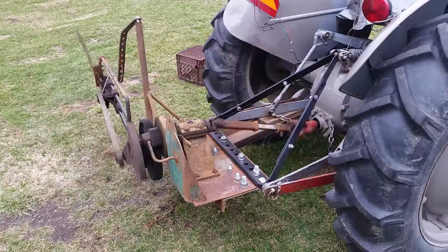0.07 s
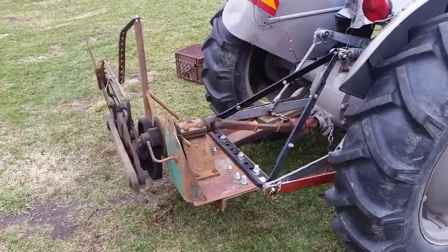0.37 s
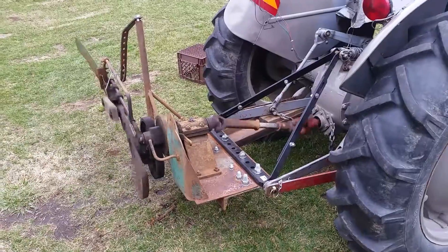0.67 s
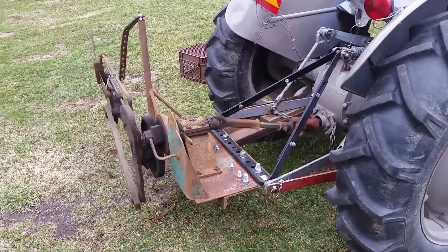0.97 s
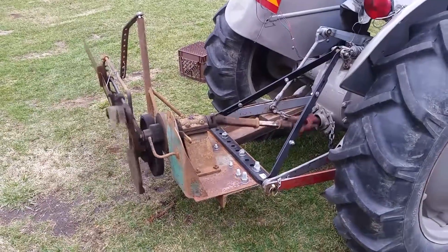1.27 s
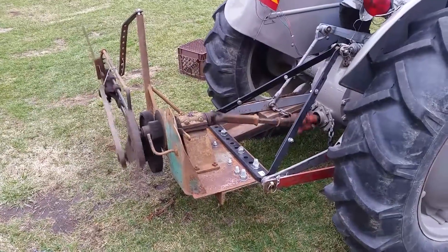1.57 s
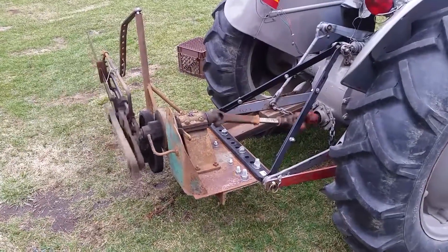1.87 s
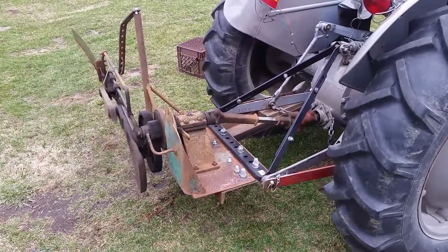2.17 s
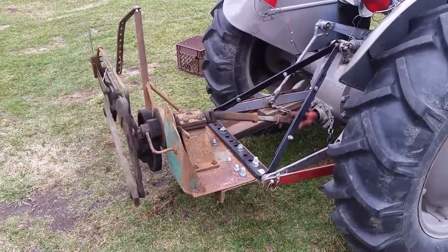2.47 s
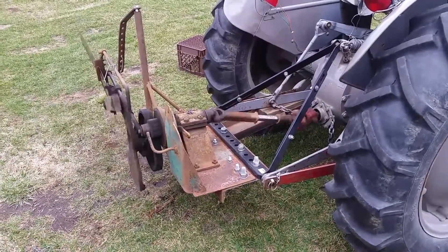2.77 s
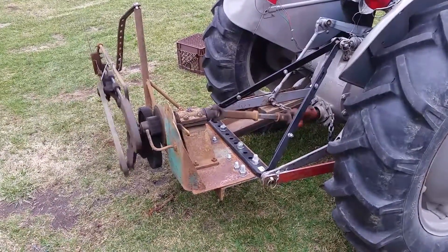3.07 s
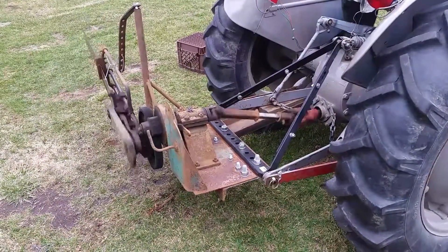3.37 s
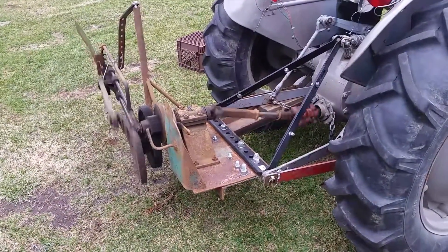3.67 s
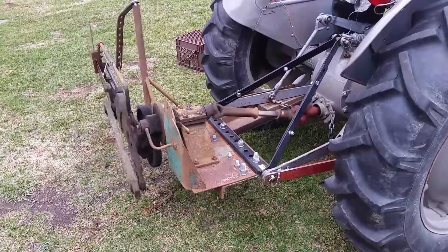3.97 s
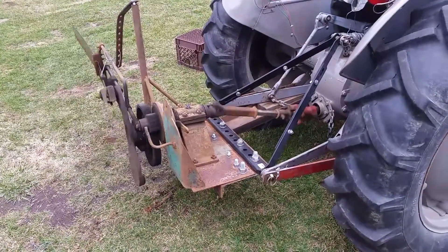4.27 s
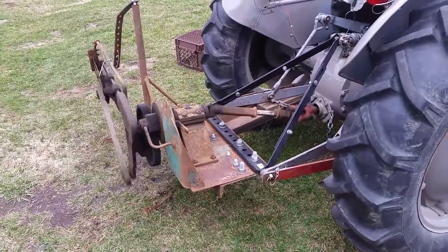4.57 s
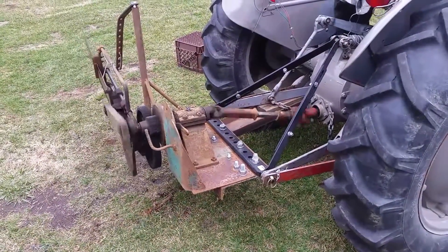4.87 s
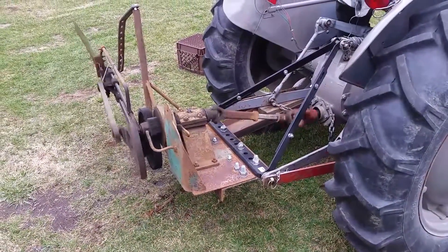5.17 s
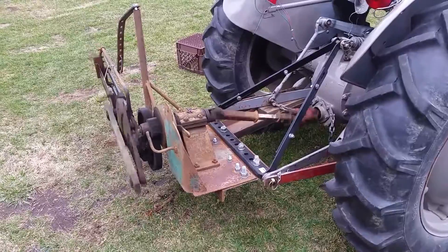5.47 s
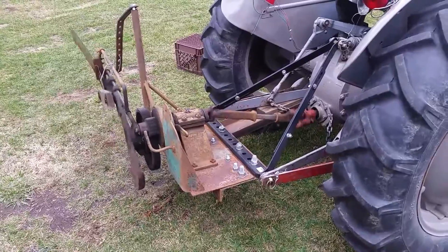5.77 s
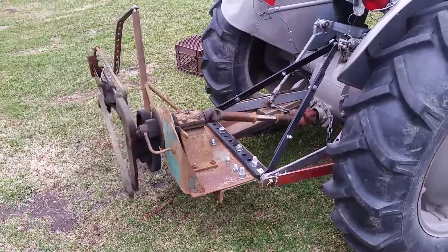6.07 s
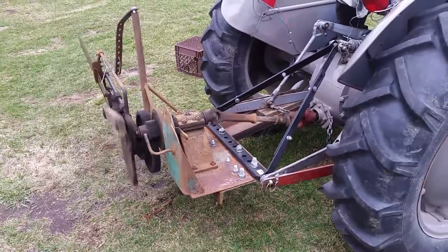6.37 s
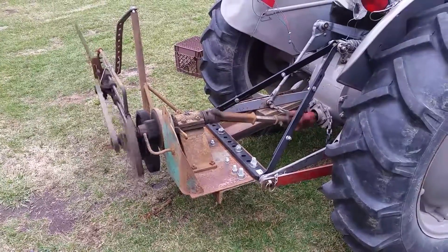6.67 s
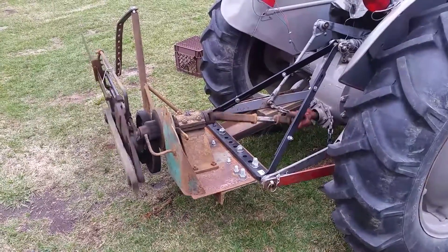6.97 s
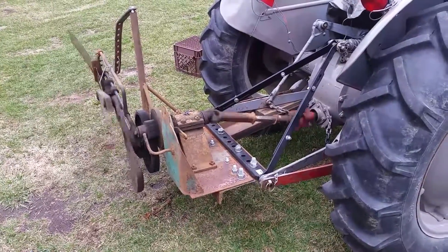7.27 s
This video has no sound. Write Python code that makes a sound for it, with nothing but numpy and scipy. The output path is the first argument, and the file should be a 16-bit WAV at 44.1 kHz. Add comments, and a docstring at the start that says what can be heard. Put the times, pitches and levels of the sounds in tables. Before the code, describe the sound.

Rhythmic metal clanks, clinks and brief squeaks from a loose saw crank repeat over the low throb of an idling tractor.

```python
"""The throb of an idling tractor fades in on an open lawn: exhaust pulses, block roar, ticking valves.
Its power take-off drives a drag saw, whose loose crank linkage rattles the steel frame and plays the
same round of clinks, clanks and one dry squeak every stroke; in some strokes the arm flails and slams.
A few gusts buffet the microphone, whose left port is muffled."""
import sys
import numpy as np
from scipy import signal
from scipy.fft import rfft, irfft, next_fast_len
from scipy.io import wavfile

SR = 44100
rng = np.random.default_rng(int(sys.argv[2]) if len(sys.argv) > 2 else 0)


def wav_out(sig):
    """Save sig, one row per channel (or a flat mono array), as 16-bit PCM at SR to the path in sys.argv[1]."""
    wavfile.write(sys.argv[1], SR, np.round(np.clip(np.atleast_2d(sig).T, -1, 1) * 32767).astype(np.int16))


N = 323253

# Levels in the tables are relative: each source adds its own trim.
# The wandering idle. Each row: time in seconds, crankshaft turns per second.
IDLE_SPEED = [(0.0, 29.91), (0.6, 29.91), (1.05, 29.75), (1.3, 29.93), (2.0, 30.0), (2.8, 30.08),
              (3.4, 30.06), (4.3, 30.11), (4.75, 29.99), (5.2, 30.23), (5.65, 30.03), (5.95, 29.39),
              (6.5, 29.66), (6.9, 29.65), (7.15, 30.06), (7.33, 30.07)]
# The exhaust note. Each row: multiple of the crankshaft rate, level in dB.
EXHAUST_ORDERS = [(.5, -34), (1, -41), (1.5, -23), (2, -2), (2.5, -33), (3, -3), (3.5, -56), (4, -11.5),
                  (4.5, -29.5), (5, -18.5), (6, -24.5), (9, -27.5), (10, -30), (12, -29.5), (13, -32)]
# The block's roar and the valve gear's hiss. Each row: frequency in Hz, spectral level in dB.
BLOCK_COLOUR = [(100, 4), (180, -1), (260, -1), (330, -1), (400, 2), (500, -8), (750, -12.5), (1150, -15),
                (2000, -22), (3000, -45), (6000, -50.5)]
HISS_COLOUR = [(1500, -26), (2900, -2), (4500, -7), (6300, 2.5), (7500, 2), (8300, 1), (9700, 0),
               (10600, 0), (12500, -6), (13500, -12), (16000, -8)]
# Valve ticks of one two-turn cycle. Each row: turns into the cycle, level in dB.
VALVE_TICKS = [(.12, -8.5), (.55, 4.5), (1.08, -3), (1.55, 4), (1.779, -3)]
# Resonances of the thin steel in engine and slide, then of the saw's frame and arm.
# Each row: frequency in Hz, bandwidth in Hz, level in dB.
THIN_MODES = [(2940, 230, -2.5), (3450, 210, -7), (4800, 3300, 0), (5720, 1000, -6), (6810, 920, 1),
              (7350, 480, 1.5), (8020, 570, 0.5), (8810, 280, -1.5), (9700, 350, -3), (11000, 850, -6.5),
              (12900, 800, -4)]
FRAME_MODES = [(649, 78, -2), (813, 44, -3), (898, 43, -4), (996, 47, 0), (1336, 55, -1), (1474, 97, 2.5),
               (1626, 53, -5.5), (1791, 65, 0), (1955, 84, -2), (2290, 180, -6.5), (2935, 76, -10),
               (3570, 41, -12), (3870, 420, -13.5)]
# Saw strokes, about 22 engine turns each. Each row: start in seconds, then looseness, arm flail,
# pin rebound, chain, squeak and high ring, all in dB.
SAW_STROKES = [(.006, 0.5, 0, 0, 0, -52, -45), (.746, .5, -1, 2, -1.5, -34, -27.5),
               (1.478, -1, 2.5, 0, 1, -33, -33), (2.2127, .5, -2, 1, 0.5, -32, -36),
               (2.945, -1, 0.5, 2, -3, -28.5, -35), (3.6743, 0, 2.5, -25, -4.5, -28.5, -31),
               (4.4055, 0.5, 4.5, -8, 1, -30, -37), (5.143, 2, -1.5, 2, -11, -48, -45),
               (5.852, -1, -3, 1, -0.5, -31, -50), (6.5928, -2.5, 6.5, -4, -9, -26.5, -34)]
# Sliding contact through a stroke. Each row: share of the stroke, rattle in dB, dry rubbing in dB.
SLIDE_LOAD = [(0, -36.5, -34.5), (.09, -34, -39), (.19, -35.5, -34.5), (.36, -35.5, -41.5),
              (.42, -35, -35.5), (.51, -34, -40.5), (.6, -31, -38), (.665, -37.5, -37.5), (.75, -34.5, -36),
              (.82, -35.5, -35), (.9, -34, -37), (1, -34.5, -36)]
# The chain on the way back. Each row: share of the stroke, level in dB, ring pitch in Hz.
CHAIN_CLINKS = [(.501, -18.5, 9430), (0.54, -29, 6900), (.62, -15.5, 5040), (0.632, -22.5, 9630),
                (0.704, -17, 6670)]
# Stray clinks of loose parts. Each row: time in seconds, level in dB, ring pitch in Hz.
LOOSE_CLINKS = [(0.521, -18, 7300), (0.612, -14, 8100), (1.5354, -27, 5700), (2.8837, -19.5, 6160),
                (4.0696, -23, 4400), (4.555, -19, 9660), (4.566, -14.5, 5600), (5.01, -15, 4670),
                (5.4784, -21.5, 8600), (5.8168, -16.5, 6300), (5.946, -20, 6740), (6.489, -23, 6600),
                (6.868, -19, 5870), (7.113, -18, 7360)]
# Rings of the pins and chain. Each row: frequency in Hz, level in dB.
PIN_RINGS = [(4150, -2), (5000, 0), (5780, 7.5), (7500, 3.5), (8600, 4.5), (9600, -1)]
# A clink's crack, a joint's bite, a clank's thud. Each row: frequency in Hz, spectral level in dB.
CRACK_COLOUR = [(600, -5), (1500, 6.5), (2600, 0), (4000, 2.5), (5500, 3.5), (7600, -0.5), (9700, 5.5),
                (11000, -11), (13000, -9.5), (16000, -25)]
BITE_COLOUR = [(1000, -26), (2100, 12.5), (2700, -6), (4000, 3), (5500, -12), (9000, -6), (16000, -45)]
THUD_COLOUR = [(200, -43), (400, -1), (520, 1), (700, -8), (1000, -16), (2000, -47)]
# The arm's round of clanks. Each row: share of the stroke, level in dB, main pitch in Hz,
# thud in dB, bite in dB.
ARM_CLANKS = [(.003, -29, 1480, -41, -39), (.135, -28, 1300, -32, -51), (.203, -27.5, 1700, -31, -42),
              (.292, -26.5, 1390, -46, -31), (.455, -28.5, 1360, -27, -39), (.562, -23, 1200, -38, -40),
              (0.709, -24.5, 1410, -36, -32), (.738, -28, 1757, -27, -35), (.868, -24.5, 1600, -27, -26.5)]
# The arm hits its stop. Each row: time in seconds, level in dB, main pitch in Hz, thud in dB, bite in dB.
ARM_SLAMS = [(.657, -19, 2110, -37, -15.5), (.685, -26, 1320, -15.5, -34), (.739, -28, 1940, -20, -27),
             (1.264, -22, 1340, -26, -36), (3.773, -25, 996, -32, -40), (3.906, -25, 950, -13.5, -27),
             (3.96, -15.5, 710, -17, -22), (4.214, -21.5, 1910, -25, -37), (4.644, -18, 965, -26, -23),
             (5.054, -17.5, 1443, -28, -14), (5.138, -17, 1550, -34, -19), (5.844, -21.5, 1500, -19, -23),
             (6.398, -24.5, 1810, -15, -32), (6.688, -18, 1430, -17.5, -39), (6.763, -19, 1550, -16, -33),
             (6.833, -22, 1350, -12.5, -38)]
# Thin whistles of the dry crank pin. Each row: time in seconds, pitch in Hz, level in dB.
PIN_WHISTLES = [(.69, 4370, -27), (.84, 12100, -32), (4.08, 4370, -33), (6.7, 11400, -30),
                (6.79, 12200, -31)]
# The squeak's pitch creeps as the steel rubs dry. Each row: time in seconds, pitch in Hz.
SQUEAK_CREEP = [(1.04, 3800), (3.9, 4020), (6.15, 3930), (6.9, 4080)]
# Gusts on the ports. Each row: peak time in seconds, half-width in seconds, left in dB, right in dB.
PORT_GUSTS = [(2.013, 0.035, -11, -26), (2.157, 0.028, -5.5, -34), (2.241, 0.04, -9.5, -37),
              (3.613, 0.044, -18, -25), (3.726, 0.083, -26, -20), (6.026, 0.083, -11, -27),
              (6.105, 0.047, -8.5, -27), (6.8, .04, -21, -14), (6.906, 0.033, -1.5, -29),
              (6.983, 0.048, -10.5, -39), (7.14, 0.19, -15, -32)]
# Their rumble. Each row: frequency in Hz, spectral level in dB.
BUFFET_COLOUR = [(25, -18), (80, 0.5), (150, -2), (230, -9), (350, -20), (600, -39), (1500, -67)]
# Stereo image of the noises. Each row: frequency in Hz, left-right correlation from 0 to 1.
PORT_LIKENESS = [(60, 1), (300, 0.9), (700, 0.52), (2400, 0.31), (4400, 0.27), (10000, .1)]
# The left port is duller. Each row: frequency in Hz, left minus right in dB.
LEFT_MUFFLE = [(70, -1.5), (400, -2.5), (520, -4.5), (750, -7.5), (1200, -10.5), (1800, -8), (2700, -10.5),
               (4200, -16.5), (6400, -27.5), (9800, -35), (15000, -9.5)]
# It is also late. Each row: frequency in Hz, lag in radians.
LEFT_LAG = [(30, 0.19), (75, 0.31), (150, 0.63), (400, 0.96), (1000, 1.3), (2500, 1.57)]


def from_db(db):
    """Decibels to gain."""
    return 10 ** (np.asarray(db) / 20)


def rms_one(x):
    """Scale to unit power."""
    return x / np.sqrt(np.mean(x ** 2) + 1e-20)


def seconds():
    """Time of every sample."""
    return np.arange(N) / SR


def per_bin(points):
    """Read (Hz, value) points on a log axis at every FFT bin."""
    hz, value = np.transpose(points)
    return np.interp(np.log(np.fft.rfftfreq(next_fast_len(N), 1 / SR) + 1), np.log(hz), value)


def equalise(x, gain):
    """Filter by a gain per FFT bin."""
    size = next_fast_len(N)
    return irfft(rfft(x, size) * gain, size)[..., :N]


def noise(colour):
    """Coloured stereo noise of unit power, centred in the bass and wide in the treble."""
    alike = per_bin(PORT_LIKENESS)
    gains = from_db(per_bin(colour)) * np.sqrt([1 + alike, 1 - alike])
    mid, side = equalise(rng.standard_normal((2, N)), gains)
    return rms_one(np.array([mid + side, mid - side]))


def drift(knots_per_s):
    """A random wobble of unit power."""
    knots = rng.standard_normal(9000)
    return rms_one(np.interp(seconds() * knots_per_s, np.arange(len(knots)), knots))


def bursts(times, gains, rise_s, decay_s):
    """Envelope of contacts that build up quickly and die away; overlapping ones add in power."""
    hits = np.zeros(N)
    np.add.at(hits, np.clip(np.asarray(times) * SR, 0, N - 1).astype(int), np.square(gains))
    fall, lag = np.exp(-2 / (decay_s * SR)), np.exp(-1 / (rise_s * SR))
    power = signal.lfilter([1], [1, -fall], hits + 1e-18)
    return signal.lfilter([1 - lag], [1, -lag], np.sqrt(power))


def resonate(x, hz, width_hz):
    """One resonance; white noise keeps its power."""
    radius = np.exp(-np.pi * width_hz / SR)
    feedback = [1, -2 * radius * np.cos(2 * np.pi * hz / SR), radius ** 2]
    return signal.lfilter(np.sqrt((1 - radius ** 2) / 2) * np.array([1, 0, -1]), feedback, x)


def add_ring(out, start_s, hz, gain, decay_s):
    """Mix in a damped sine."""
    start = int(start_s * SR)
    age = np.arange(min(SR // 6, N - start)) / SR
    out[..., start:start + len(age)] += gain * np.exp(-age / decay_s) * np.sin(2 * np.pi * hz * age)


def exhaust(turn, level_db=-16, waver=.096, smear=.72):
    """Pressure pulses as crankshaft orders; the silencer holds back the low ones, smearing each pulse."""
    note = np.zeros(N)
    for order, db in EXHAUST_ORDERS:
        held_back = smear * (order - 2) * (order - 3)
        strength = from_db(level_db + db) * (1 + waver * order / 2 * drift(25))   # no two firings alike
        note -= np.sqrt(2) * strength * np.sin(2 * np.pi * order * turn + held_back)
    return note


def engine_block(turn, roar_db=-26, throb_db=3, firing_turn=.069, shake_db=-31):
    """The block and panels roar a little louder at each firing, over a low shaking."""
    throb = from_db(throb_db * np.cos(4 * np.pi * (turn - firing_turn)) + 1.24 * drift(16))
    shaking = noise([(12, -14), (23, -13), (38, -2), (100, -8), (160, -11), (400, -37), (1500, -74)])
    return from_db(roar_db) * throb * noise(BLOCK_COLOUR) + from_db(shake_db) * shaking


def valves_and_slide(turn, tick_db=-33, rub_db=-3, hiss_db=-43, uneven_db=3, scatter_db=6, grain_db=2.5):
    """Valve ticks and the dry slide's rubbing set thin steel ringing, over a steady hiss."""
    place, accent_db = np.transpose(VALVE_TICKS)
    cycle_starts = 2 * np.arange(turn[-1] // 2 + 1)
    tick_turns = (cycle_starts[:, None] + place).ravel()
    times = np.interp(tick_turns[tick_turns < turn[-1]], turn, seconds())
    chance = rng.standard_normal((len(times), len(THIN_MODES) + 1))   # each tick favours other modes
    level_db = tick_db + np.resize(accent_db, len(times)) + uneven_db * chance[:, -1]
    _, slide_db = sliding_db()
    rub = from_db(slide_db + rub_db)
    total = np.linalg.norm(from_db(np.array(THIN_MODES)[:, 2]))
    white, steel = rng.standard_normal((3, 2, N)), np.zeros((2, N))
    for k, (hz, width_hz, db) in enumerate(THIN_MODES):
        ticks = bursts(times, from_db(level_db + scatter_db * chance[:, k]), rise_s=.0039, decay_s=.0058)
        force = np.hypot(ticks, rub * from_db(grain_db * drift(70))) * white[k % 3]
        steel += from_db(db) / total * resonate(force, hz, width_hz)
    # the air and the port dull the very top
    steel = signal.sosfilt(signal.butter(3, 11000, fs=SR, output="sos"), steel)
    return steel + from_db(hiss_db) * noise(HISS_COLOUR)


def stroke_edges(last_stroke_s=.737):
    """Start of every stroke and end of the last one."""
    starts = np.array(SAW_STROKES)[:, 0]
    return np.append(starts, starts[-1] + last_stroke_s)


def stroke_time(stroke, share):
    """When the crank is this far through a stroke."""
    edges = stroke_edges()
    return np.interp(stroke + share, np.arange(len(edges)), edges)


def slack_db(stroke, share, flail_from=.125, flail_to=.44):
    """Each stroke has its own slack, and in some the arm flails on the way out."""
    loose_db, flail_db = np.array(SAW_STROKES)[:, 1:3].T
    return loose_db[stroke] + flail_db[stroke] * ((share > flail_from) & (share < flail_to))


def sliding_db(rub_follows=.99):
    """Levels of the rattle and of the dry rubbing as the crank goes round."""
    edges = stroke_edges()
    position = np.interp(seconds(), edges, np.arange(len(edges)))
    stroke, share = np.minimum(position.astype(int), len(SAW_STROKES) - 1), position % 1
    place, rattle_db, rub_db = np.transpose(SLIDE_LOAD)
    slack = slack_db(stroke, share)
    rattle = np.interp(share, place, rattle_db) + slack
    rubbing = np.interp(share, place, rub_db) + rub_follows * slack
    return rattle, rubbing


def linkage(knocks_per_s=170, knock_db=-2, scrape_db=-4, clank_db=-5, uneven_db=2, stereo_spread=.58):
    """Slack joints knock at random and clank when the load turns over; both ring the steel frame."""
    times, level_db, main_hz, _, _ = clank_events().T
    knocks = (rng.random(N) < knocks_per_s / SR) * from_db(uneven_db * rng.standard_normal(N))
    rattle_db, _ = sliding_db()
    rattle = from_db(rattle_db) * (from_db(knock_db) * rms_one(knocks) + from_db(scrape_db))
    chatter = rms_one(rng.standard_normal((3, 1, N)) + stereo_spread * rng.standard_normal((3, 2, N)))
    total = np.linalg.norm(from_db(np.array(FRAME_MODES)[:, 2]))
    frame = np.zeros((2, N))
    for k, (hz, width_hz, db) in enumerate(FRAME_MODES):
        favour = .5 + np.exp(-np.log2(hz / main_hz) ** 2)   # each contact point favours other modes
        blows = bursts(times, from_db(level_db + clank_db) * favour, rise_s=.00015, decay_s=.016)
        force = np.hypot(rattle, blows) * chatter[k % 3]
        frame += from_db(db) / total * resonate(force, hz, width_hz)
    return frame


def clink_events(detune=.074, rebound_s=.017):
    """Cue list of the clinks. Each row: time in seconds, level in dB, ring pitch in Hz."""
    rows = []
    for stroke, (start, _, _, rebound_db, chain_db, _, _) in enumerate(SAW_STROKES):
        rows.append((start, -13.5, 7600))   # the crank pin snaps over
        rows.append((start + rebound_s, -17 + rebound_db, 7300))
        rows += [(stroke_time(stroke, share), db + chain_db, hz) for share, db, hz in CHAIN_CLINKS]
    rows = np.array(rows)
    rows[:, 2] *= np.exp(detune * rng.standard_normal(len(rows)))
    return np.vstack([rows, LOOSE_CLINKS])


def clinks(crack_db=-3, ring_db=-5, ring_s=.0044, modes_db=-15, tail_db=-19, body_db=-23):
    """Small steel parts meet: a crack, short rings, a knock in the frame, a scatter off the tractor."""
    events = clink_events()
    times, level_db, _ = events.T
    crack = bursts(times, from_db(level_db + crack_db), rise_s=.0003, decay_s=.0038)
    tail = bursts(times, from_db(level_db + tail_db), rise_s=.0021, decay_s=.022)
    body = bursts(times, from_db(level_db + body_db), rise_s=.0004, decay_s=.0076)
    out = np.hypot(crack, tail) * noise(CRACK_COLOUR) + body * noise(BITE_COLOUR)
    for at, db, hz in events:
        add_ring(out, at, hz, from_db(db + ring_db), ring_s)
        for mode_hz, mode_db in PIN_RINGS:
            add_ring(out, at, mode_hz, rng.standard_normal() * from_db(db + modes_db + mode_db), ring_s)
    return out


def clank_events():
    """Cue list of slams and clanks, laid out like ARM_SLAMS; slack makes a clank harder."""
    rows = list(ARM_SLAMS)
    for stroke in range(len(SAW_STROKES)):
        for share, db, hz, thud_db, bite_db in ARM_CLANKS:
            slack = slack_db(stroke, share)
            rows.append((stroke_time(stroke, share), db + slack, hz, thud_db + slack, bite_db + slack))
    return np.array(rows)


def clanks(ring_db=-4, ring_s=.0097, thud_trim_db=-7, bite_trim_db=-6):
    """Each blow thuds through the base plate, bites at the joint and rings the arm's strongest mode."""
    times, level_db, main_hz, thud_db, bite_db = clank_events().T
    thud = bursts(times, from_db(thud_db + thud_trim_db), rise_s=.00087, decay_s=.027)
    bite = bursts(times, from_db(bite_db + bite_trim_db), rise_s=.00051, decay_s=.028)
    out = thud * noise(THUD_COLOUR) + bite * noise(BITE_COLOUR)
    for at, db, hz in zip(times, level_db, main_hz):
        add_ring(out, at, hz, from_db(db + ring_db), ring_s)
    return out


def squeaks(stroke_share=.412, half_width_s=.01, octave_db=-2, whistle_db=-2, bar_hz=11350):
    """The dry pin whistles; once a stroke the slide sticks and slips, waking a high ring of the bar."""
    out, unsteady = np.zeros(N), drift(1100)
    slips = [(at, hz, whistle_db + db, .025) for at, hz, db in PIN_WHISTLES]
    for stroke, (*_, squeak_db, bar_db) in enumerate(SAW_STROKES):
        at = stroke_time(stroke, stroke_share)
        hz = np.interp(at, *np.transpose(SQUEAK_CREEP))
        slips.append((at, hz, squeak_db, .04))
        slips.append((at, 2 * hz, squeak_db + octave_db, .05))
        slips.append((at, bar_hz, bar_db, .018))
    for at, hz, db, wobble in slips:
        near = int(at * SR) + np.arange(-SR // 20, SR // 20)
        swell = from_db(db) * np.exp(-((near / SR - at) / half_width_s) ** 2)
        pitch_hz = hz * (1 + wobble * unsteady[near])
        out[near] += swell * np.sin(2 * np.pi * np.cumsum(pitch_hz) / SR)
    return out


def wind(level_db=-1):
    """Short gusts buffet the microphone ports, mostly the left one."""
    force = np.zeros((2, N))
    for at, half_width_s, left_db, right_db in PORT_GUSTS:
        force += from_db([[left_db], [right_db]]) * np.exp(-((seconds() - at) / half_width_s) ** 2)
    buffets = equalise(rng.standard_normal((2, N)), from_db(per_bin(BUFFET_COLOUR)))
    return from_db(level_db) * force * rms_one(buffets)


def scene(start_turn=.565):
    """Engine, saw and wind in the open air."""
    turns_per_s = np.interp(seconds(), *np.transpose(IDLE_SPEED))
    turn = start_turn + np.cumsum(turns_per_s) / SR
    saw = linkage() + clanks() + clinks() + squeaks()
    return exhaust(turn) + engine_block(turn) + saw + wind() + valves_and_slide(turn)


def record(dry, silent_s=.4, fade_s=.3, ceiling=.92, cutoff_hz=16700):
    """The left port is muffled and late; the sound fades in, peaks are rounded and the top is cut."""
    muffle = from_db(per_bin(LEFT_MUFFLE))
    left = muffle * np.exp(-1j * per_bin(LEFT_LAG))
    keep_power = np.sqrt(2 / (1 + muffle ** 2))
    ports = equalise(dry, np.array([left, np.ones_like(left)]) * keep_power)
    faded = ports * np.clip((seconds() - silent_s) / fade_s, 0, 1)
    rounded = faded / (1 + (faded / ceiling) ** 8) ** (1 / 8)
    return signal.sosfilt(signal.cheby2(16, 70, cutoff_hz, fs=SR, output="sos"), rounded)


dry = scene()
out = record(dry)
wav_out(out)
```